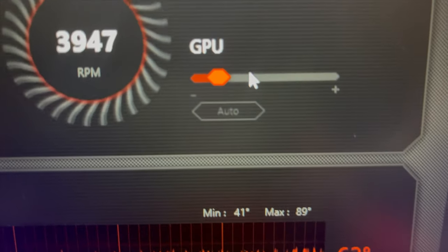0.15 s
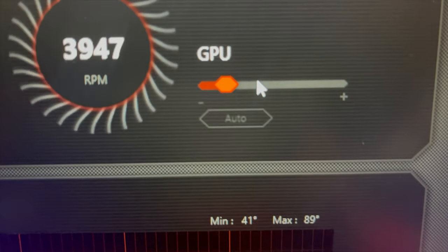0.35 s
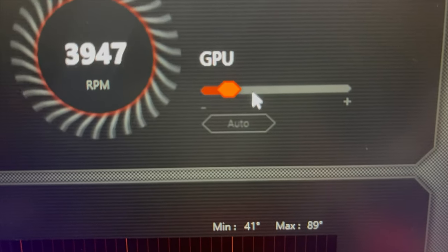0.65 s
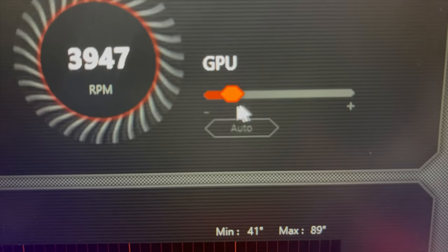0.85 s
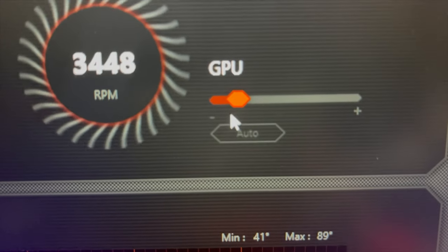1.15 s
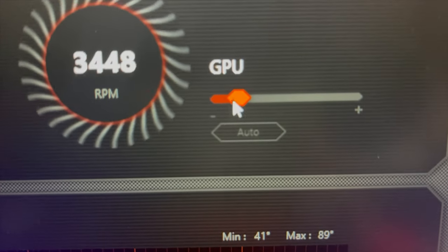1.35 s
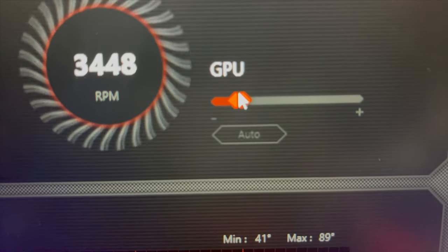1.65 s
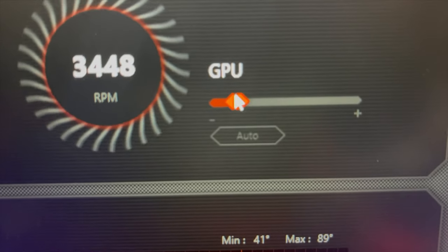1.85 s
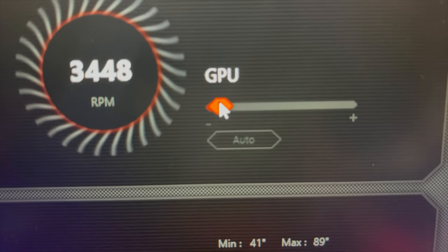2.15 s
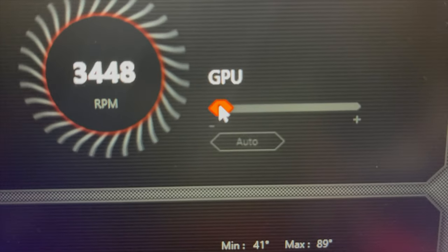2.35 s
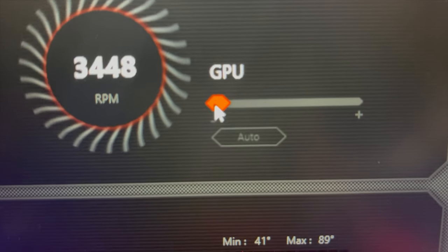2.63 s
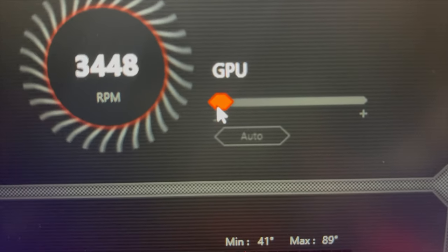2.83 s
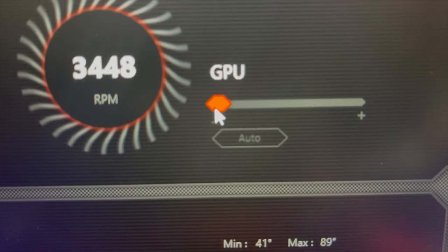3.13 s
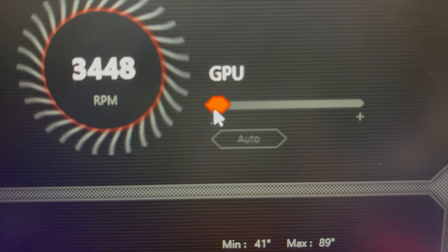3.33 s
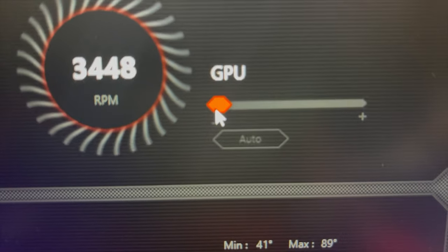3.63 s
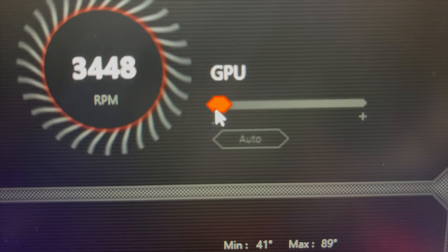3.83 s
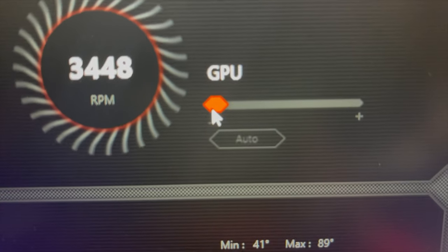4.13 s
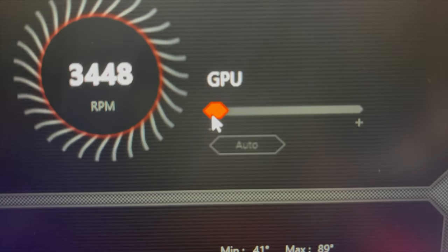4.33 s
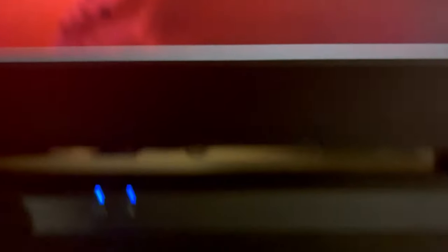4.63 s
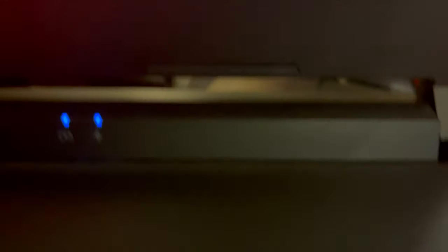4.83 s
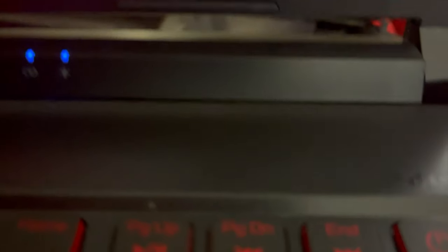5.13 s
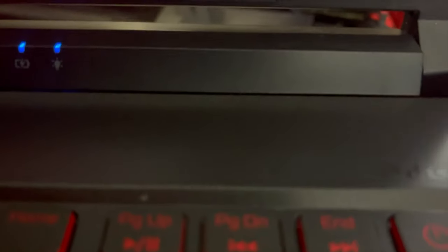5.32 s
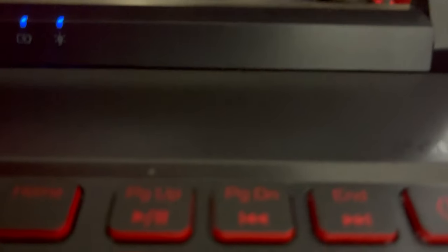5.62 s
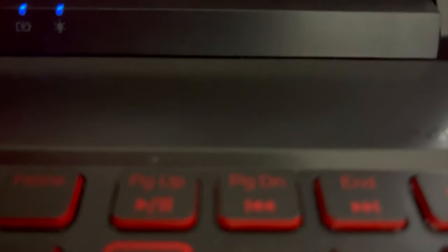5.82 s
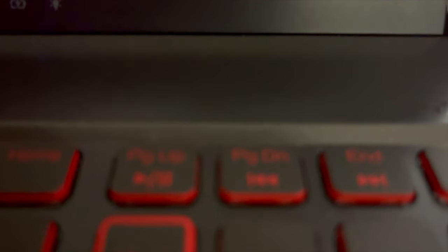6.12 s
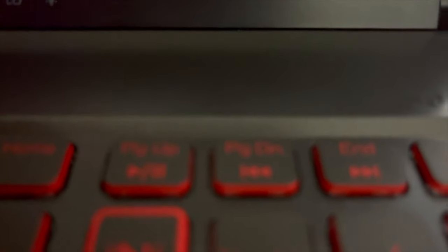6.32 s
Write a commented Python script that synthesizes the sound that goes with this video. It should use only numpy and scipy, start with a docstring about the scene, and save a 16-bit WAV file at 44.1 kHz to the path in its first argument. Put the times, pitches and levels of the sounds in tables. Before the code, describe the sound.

Low laptop fan hum with a quickening flutter and small button clicks, cutting abruptly to a nearer, throbbing, whining, hissing growl.

```python
"""At a laptop's screen, and from 4.4 s right at its vent: a worn fan flutters ever faster against a second fan
as a controller parts their speeds in short glides. Shaft harmonics with beat sidebands make its tones, and
filtered noise chopped by the rotor makes its air. The second fan whistles and whines. The touchpad button clicks
(decaying noise and modes). A softly thudding motor drone and mains hum are sines; at the vent the worn rotor's
unbalance beats against the drone, about eight throbs a second."""
import sys
import numpy as np
from scipy.fft import rfft, irfft, next_fast_len
from scipy.io import wavfile
from scipy.ndimage import map_coordinates

SR = 44100
rng = np.random.default_rng(int(sys.argv[2]) if len(sys.argv) > 2 else 0)


def transcribe(u):
    """Save the signal u as a 16-bit wav file named by the first command-line argument.

    u: samples, shape (n,) or (channels, n), limited to [-1, 1]; the rate is SR.
    q: integer samples, one column per channel.
    """
    v = np.clip(np.atleast_2d(u).T, -1, 1)
    q = np.round(v * 32767).astype(np.int16)
    wavfile.write(sys.argv[1], SR, q)


N = 285327
T = np.arange(N) / SR

# worn fan's tones at the screen, before waver and tilt: turn_multiple, then peak level of five lines:
# two_beats_below_db, one_below_db, centre_db, one_above_db, two_above_db
TONES_FAR = [(5, -75, -67, -59, -67, -67), (6, -64, -57, -45.5, -57, -60), (7, -62, -47, -54, -58, -62),
             (8, -70, -66, -60, -65, -68), (10, -70, -59, -60, -63, -62), (11, -68, -52, -54, -54, -56),
             (12, -57, -50.5, -50, -57, -64), (13, -65, -49.5, -51, -51.5, -63),
             (14, -61, -61, -65, -64, -70)]
# the same at the vent, before growl and throbs: turn_multiple, two_beats_below_db, one_below_db, centre_db,
# one_above_db, two_above_db
TONES_NEAR = [(2, -70, -58, -54, -45, -62), (3, -48, -42.5, -53, -60, -70), (4, -58, -54, -57, -58, -62),
              (5, -45.5, -54, -49, -56, -58), (6, -56, -46, -39.5, -58, -58), (7, -66, -49, -52, -53, -63),
              (8, -60, -66, -52, -59, -62), (9, -66, -68, -49.5, -60, -62), (10, -70, -45.5, -51, -60, -60),
              (11, -62, -46, -46, -46, -55), (12, -56, -40, -49, -54, -54), (13, -58, -39, -49, -58, -66),
              (14, -62, -55, -70, -69, -68), (15, -70, -56, -68, -70, -70)]
# vent tones that throb, as three turns of the second fan almost match two of the worn one:
# turn_multiple, depth_0_to_1, swell_s
THROBS = [(3, .35, 5.5), (6, .38, 5.39), (7, .5, 5.34)]
# steady lines of the room's hum, at the screen: pitch_hz, peak_db
HUM_LINES = [(71.85, -51), (83.6, -51), (119.83, -45), (155.5, -50), (179.75, -56.5), (239.66, -41.5),
             (299.6, -54), (419.4, -52.5)]
# low air noise at the screen: freq_hz, density_db_per_hz
RUSH_FAR = [(20, -85), (34, -67), (50, -63.5), (85, -62), (140, -59.5), (200, -68), (310, -71),
            (420, -69.5), (520, -72.5), (780, -71), (870, -68), (980, -82.5), (1400, -110), (6000, -150)]
# low air noise at the vent: freq_hz, density_db_per_hz
RUSH_NEAR = [(20, -87), (34, -80), (50, -50.5), (90, -58.5), (150, -59.5), (210, -64), (310, -67.5),
             (400, -66), (520, -72), (780, -65), (870, -68), (980, -71.5), (1400, -110), (6000, -150)]
# high air noise at the screen: freq_hz, density_db_per_hz
HISS_FAR = [(600, -100), (1000, -73), (1450, -80.5), (1650, -80.5), (2200, -83), (2500, -77.5), (3000, -80),
            (4200, -92.5), (6600, -92.5), (7600, -100), (8600, -96.5), (9550, -89), (10300, -97),
            (11800, -101), (13200, -135)]
# high air noise at the vent: freq_hz, density_db_per_hz
HISS_NEAR = [(600, -100), (1000, -77.5), (1600, -79.5), (2100, -75.5), (2550, -73), (3100, -81),
             (3900, -88), (5300, -84.5), (6500, -87.5), (7400, -99), (8700, -96), (10300, -91),
             (11800, -100), (13200, -135)]
# narrow resonances between screen and keyboard: centre_hz, width_hz, level_db
HINGE = [(1092, 73, 4.5), (1310, 71, 0.5), (1450, 87, 9), (2002, 50, 9), (2418, 103, 7.5), (3130, 155, -12),
         (3290, 200, 6.5), (3440, 78, -3.5), (4670, 150, 2), (4850, 170, -7), (5020, 46, 6.5),
         (5350, 150, 5.5), (5900, 80, 6.5), (6180, 160, -1.5), (6180, 55, 12.5), (6540, 49, 8),
         (6720, 50, 8), (6800, 46, 4), (7170, 64, -1.5)]
# resonances of the screen's panel, lifting lines that glide onto them: centre_hz, width_hz, level_db
PANEL = [(831, 8, 5), (700, 8, 3)]
# resonances and hollows of the vent's duct: centre_hz, width_hz, level_db
DUCT = [(1780, 53, -3), (2560, 73, 4), (3000, 100, 3.5), (3250, 110, 4.5), (3420, 110, -2.5),
        (4570, 120, 4), (5270, 200, 3), (6110, 110, -3), (6500, 80, 6), (6770, 120, 5.5)]
# likeness of the two microphone ports: freq_hz, likeness_0_to_1
ALIKE = [(60, 1), (130, 0.83), (380, 0.55), (640, 0.73), (880, 0.75), (1100, 0.31), (1600, 0.36),
         (2400, 0.6), (4400, 0.62), (6500, 0.56), (7500, 0.3), (8500, 0.51), (9200, 0.59), (10300, 1)]
# level between the ports: freq_hz, left_minus_right_db
BALANCE = [(60, -0.5), (130, -2), (400, -0.5), (800, 1), (1500, -1.5), (2500, -3.5), (5000, -1), (7000, 0)]
# phase between the ports: freq_hz, right_lead_rad
LEAD = [(60, 0), (400, .15), (600, .35), (700, .75), (780, 1.1), (850, 1.8), (950, 2.1), (1300, 3.2),
        (1700, 3.8), (2000, 5.7), (2500, 6.6), (3300, 6.5), (4200, 7.1), (6200, 6.7), (7500, 8.2),
        (8400, 6.3), (8900, 6.3), (10300, 3.2), (10900, 2.8), (11500, .2)]
# controller's retunings: start_s, worn_fan_change_hz, second_fan_change_hz
SPEED_STEPS = [(0.41, 0.59, 0.13), (2.18, 1.2, -1.7), (3.29, 0.49, -1.82), (4.63, 0.33, -1.78),
               (5.79, 0.34, -1.76)]
# second fan's motor whine: turn_multiple, screen_peak_db, vent_peak_db
WHINE = [(8, -63, -45), (12, -51, -52), (18, -65, -41.5)]
# whooshing slots of the vent's grille, before scraping: from_s, to_s, centre_hz, width_hz, rms_db
SLOTS = [(4.38, 4.864, 1960, 130, -50.5), (4.876, 6.02, 2490, 517, -50)]
# brief rubs of the loose rotor: centre_s, level_db
RUBS = [(4.557, -35.5), (5.037, -37), (5.276, -37), (5.542, -34), (5.679, -39), (5.825, -34.5),
        (5.963, -37.5)]
# touchpad dome snaps down, bottoms out and later springs up: start_s, level_db, ping_hz
SNAPS = [(1.685, -26, 5400), (1.6875, -28, 5400), (2.5393, -19, 7050)]
# freed pad rattles back: start_s, level_db
KNOCKS = [(2.603, -26), (2.6115, -30), (2.618, -27.5)]
# crack of the dome: freq_hz, relative_db
DOME_CRACK = [(1500, -26), (4200, -19), (5400, -7), (6200, -21), (7100, -8), (8000, 0), (9500, -7),
              (10300, 8), (11300, 3), (12000, -15), (14000, -34), (15300, -27), (17000, -45)]
# crack of the pad: freq_hz, relative_db
PAD_CRACK = [(600, -5), (1050, 2), (1500, -7), (2300, 3), (3100, -10), (4000, -20), (5200, -9), (6800, -8),
             (8900, 9), (10000, -6), (11500, -11), (13000, -53)]
# ringing of the dome: pitch_hz, relative_db, t60_s
DOME_MODES = [(6650, -10, 0.025), (7380, -6, 0.021), (8200, -7.5, 0.028), (9200, -8, .03),
              (9800, -15, 0.12), (10660, -13, .03), (11200, -4.5, .03), (12600, -14.5, .02),
              (15200, -18, .012)]
# ringing of the pad: pitch_hz, relative_db, t60_s
PAD_MODES = [(1010, -9, .1), (1830, -8, .03), (2331, -3.5, .045), (3050, -12, .03), (5006, -15, .035),
             (5437, -16, .03), (8533, -7, .03), (9050, -4, .03), (11400, -12, .03)]
# room's answer to a click: freq_hz, relative_db
ECHO = [(1000, -7), (5000, -4), (9700, 1.5), (11500, -2), (13000, -50)]

TOP_HZ = 17000
AT_VENT_S = 4.4  # the microphone is at the vent from here on

# rotors; pairs are worn fan, second fan
START_HZ = (62.61, 55.25)
VENT_JUMP_HZ = (1.83, -4.08)  # added at the vent
GLIDE_S = .59  # time to reach a new speed
IN_STEP_S = 5.014  # unbalance and drone swell together
FANS_MEET_S = (3.3197, 5.2626)  # the rotors push the chassis together: at the screen, at the vent
STRAIN_FROM_S, STRAIN_RISE_S = 2, 2  # strain between the rotors builds as their speeds part
PIVOT_ORDER, TILT_DB_PER_ORDER = 9, .8  # full strain tilts the screen tones upward about this multiple
WAKE_FROM_S, WAKE_DB = 0.4, 2.5  # upper tones and second fan grow by this much

# worn fan's air
FLAP_FROM_HZ, FLAP_DB = 660, 2.5  # at full strain the rush above this swings by +-FLAP_DB with each beat
STRAINED_FLOW_CUT_DB = 5  # and is softer by this much
GRIP_GROWTH = .5  # share by which the scraping deepens
GROWL_START_DB, GROWL_DB_PER_S = -1.5, 1.13
HISS_TOP_HZ, HISS_SWELL_S, HISS_SWELL_DB = 3600, .4, 5  # top grows as the microphone settles at the vent
SLOT_FADE_S = 0.24
RUB_HZ, RUB_WIDTH_HZ, RUB_HALF_S = 2500, 800, .004

# second fan; whistle levels before the jet
WHISTLE_FAR_DB, WHISTLE_NEAR_DB = -58, -54
JET_AT_S, JET_HALF_S, JET_DB = 5.12, .39, 8.5  # the microphone drifts through the fan's jet

# room; drone and under levels before their swell
DRONE_HZ, DRONE_DB, DRONE_WAVER_DB, DRONE_LEFT_DB = 59.09, -27.4, .2, 0.12
UNDER_HZ, UNDER_DB = 47.33, -46.5  # a deeper hum
SWELL_AT_S, DRONE_SWELL_DB, UNDER_SWELL_DB = 1.53, 2, 6.5  # both grow once and stay up
THUD_AT_S, THUDS_PER_S = .055, 11.975
THUD_HZ, THUD_HALF_S, THUD_SLIP_RAD, THUD_DB = 129, .0095, .18, -31.5
HUM_VENT_DB = 2  # hum's gain at the vent

PING_DB, PING_WIDTH_HZ, PING_T60_S = -4, 400, 0.024

PORT_HALVES = np.array([[.5], [-.5]])  # left, right


def amp(db):
    """Decibels to gain."""
    return 10 ** (np.asarray(db) / 20)


def unit(x):
    """Scale to rms 1."""
    return x / np.sqrt(np.mean(x ** 2) + 1e-20)


def along(points, hz):
    """(Hz, value) points read on a log axis."""
    f, v = np.transpose(points)
    return np.interp(np.log(hz + 1), np.log(f + 1), v)


def ramp(start_s, length_s):
    """A smooth rise from 0 to 1."""
    u = np.clip((T - start_s) / length_s, 0, 1)
    return u * u * (3 - 2 * u)


def wobble(knots_per_s):
    """A smooth random curve through normal knots."""
    coarse = T[::100]
    knots = rng.standard_normal(int(T[-1] * knots_per_s) + 4)
    return np.interp(T, coarse, map_coordinates(knots, [coarse * knots_per_s]))


def filtered(x, response):
    """x times a response of frequency."""
    m = next_fast_len(N + 8192)
    return irfft(rfft(x, m) * response(np.fft.rfftfreq(m, 1 / SR)), m)[..., :N]


def angle(hz, in_step_s, other_hz=DRONE_HZ):
    """Angle gained on another rotation; the two line up at in_step_s."""
    turns = np.cumsum(hz - other_hz) / SR
    return 2 * np.pi * (turns - np.interp(in_step_s, T, turns))


def bumps_db(bumps, hz):
    """Level change from narrow resonances."""
    return sum(db / (1 + (2 * (hz - f) / width) ** 2) for f, width, db in bumps)


def ports(pair, gain):
    """Two unrelated signals become coloured left and right, partly alike, with level and phase offsets."""
    def mix(hz):
        turn = np.arccos(np.clip(along(ALIKE, hz), -1, 1)) / 2
        return gain(hz) * np.array([np.cos(turn), np.sin(turn)])

    def offset(hz):
        return amp(PORT_HALVES * along(BALANCE, hz)) * np.exp(-1j * PORT_HALVES * along(LEAD, hz))

    mid, side = filtered(pair, mix)
    return filtered(np.array([mid + side, mid - side]), offset)


def tone(phase, hz):
    """A sine as the two ports hear it."""
    return amp(PORT_HALVES * along(BALANCE, hz)) * np.sin(phase - PORT_HALVES * along(LEAD, hz))


def air(spectrum, bumps=()):
    """Stereo turbulence noise with narrow resonances on its spectrum."""
    white = rng.standard_normal((2, N)) * np.sqrt(SR / 2)
    return ports(white, lambda hz: amp(along(spectrum, hz) + bumps_db(bumps, hz)))


def whoosh(centre_hz, width_hz):
    """Stereo noise of rms 1 in one resonance."""
    white = rng.standard_normal((2, N))
    return unit(ports(white, lambda hz: 1 / (1 + ((hz - centre_hz) / width_hz * 2) ** 4)))


def fading(hits, t60_s):
    """Envelope of blows that rise very fast and die away; overlaps add in power."""
    power, age = np.zeros(N), np.arange(SR // 2) / SR
    for s, db in hits:
        blow = (1 - np.exp(-age / 0.00033)) * amp(db - 60 * age / t60_s)
        power[round(s * SR):][:len(age)] += blow ** 2
    return np.sqrt(power)


def ringing(hits, modes, scatter_db=2.0):
    """Each blow rings decaying modes anew, with random level and phase."""
    out, age = np.zeros((2, N)), np.arange(SR // 4) / SR
    attack = 1 - np.exp(-age / 0.00026)
    for s, db in hits:
        for hz, mode_db, t60_s in modes:
            peak_db = db + mode_db + scatter_db * rng.standard_normal()
            fade = amp(peak_db - 60 * age / t60_s) * attack
            ring = np.sin(2 * np.pi * (hz * age + rng.random((2, 1))))
            out[:, round(s * SR):][:, :len(age)] += fade * ring
    return out


def speeds():
    """Turns per second of the worn and the second fan: each controller step is a short glide."""
    hz = np.array(START_HZ)[:, None] + np.outer(VENT_JUMP_HZ, T > AT_VENT_S)
    return hz + sum(np.outer([worn, second], ramp(s, GLIDE_S)) for s, worn, second in SPEED_STEPS)


def rattle():
    """Gain of upper bearing tones and second fan, which wake with the first change of speed."""
    return amp(WAKE_DB * (ramp(WAKE_FROM_S, GLIDE_S) - 0.5))


def room_hum(drone_angle):
    """A motor drones just under mains speed and thuds softly, with a deeper wavering hum and mains hum."""
    swell = ramp(SWELL_AT_S, GLIDE_S)
    drone_db = DRONE_DB + DRONE_SWELL_DB * swell + DRONE_WAVER_DB * wobble(2.76)
    drone = amp(drone_db) * tone(drone_angle, DRONE_HZ)
    drone = amp([[DRONE_LEFT_DB], [-DRONE_LEFT_DB]]) * drone

    under_angle = drone_angle + angle(np.full(N, UNDER_HZ), in_step_s=3.053)
    under_db = UNDER_DB + UNDER_SWELL_DB * swell + 0.65 * wobble(3.6)
    under = amp(under_db) * tone(under_angle, DRONE_HZ)

    age = (((T - THUD_AT_S) * THUDS_PER_S + .5) % 1 - .5) / THUDS_PER_S  # s from the nearest thud
    thud_level = amp(THUD_DB + wobble(12)) * np.exp(-(age / THUD_HALF_S) ** 2)
    thuds = thud_level * tone(2 * np.pi * THUD_HZ * age + THUD_SLIP_RAD * wobble(10), THUD_HZ)

    hum = sum(amp(db + 0.62 * wobble(1.98)) * tone(2 * np.pi * (hz * T + rng.random()), hz)
              for hz, db in HUM_LINES)
    return drone + under + thuds + amp(HUM_VENT_DB * ramp(AT_VENT_S, GLIDE_S)) * hum


def touchpad(snap_t60_s=0.015, knock_t60_s=0.022, room_t60_s=0.17, room_db=-15):
    """The button's metal dome snaps and pings, and the plastic pad rattles back; the room answers faintly."""
    def noise(spectrum):
        return unit(ports(rng.standard_normal((2, N)), lambda hz: amp(along(spectrum, hz))))

    snaps = [(s, db) for s, db, hz in SNAPS]
    ping = sum(fading([(s, db)], PING_T60_S) * whoosh(hz, PING_WIDTH_HZ) for s, db, hz in SNAPS)
    dome = amp(PING_DB) * ping + ringing(snaps, DOME_MODES) + fading(snaps, snap_t60_s) * noise(DOME_CRACK)
    pad = ringing(KNOCKS, PAD_MODES) + fading(KNOCKS, knock_t60_s) * noise(PAD_CRACK)
    echo = amp(room_db) * fading(snaps + list(KNOCKS), room_t60_s) * noise(ECHO)
    return dome + pad + echo


def second_fan(rotor, near):
    """A healthy fan: its 47 blades whistle at blade-pass rate and its motor whines at turn multiples."""
    def heard(far_db, near_db):
        return amp(far_db * (1 - near) + near_db * near)

    jet = amp(JET_DB * np.exp(-((T - JET_AT_S) / JET_HALF_S) ** 2))
    blades = amp(wobble(15)) * tone(47 * rotor + wobble(30) / 3, 2200)
    whistle = jet * heard(WHISTLE_FAR_DB, WHISTLE_NEAR_DB) * blades
    motor = sum(heard(far_db, near_db) * tone(round(k) * rotor, k * START_HZ[1])
                for k, far_db, near_db in WHINE)
    return rattle() * (whistle + motor)


def bearing(rotor, beat, tones, slip_rad, waver_db, strain=0, panel=(), throbs={}):
    """Shaft harmonics; the other fan shakes the loose rotor, so each flutters with two sidebands per side."""
    def slow(x):
        return np.broadcast_to(x, N)[::60]

    side = np.arange(-2, 3)[:, None]
    sign = np.array([[-1], [1], [1], [1], [-1]])  # broad tops, narrow dips
    turn_hz, beat_hz = [np.gradient(slow(a), slow(T)) / (2 * np.pi) for a in (rotor, beat)]
    shake = sign * np.exp(1j * side * slow(beat))
    woken = slow(rattle())
    out = np.zeros((2, N))
    for multiple, *lines_db in tones:
        k = round(multiple)
        db = np.array(lines_db)[:, None] + bumps_db(panel, k * turn_hz + side * beat_hz)
        db = db + waver_db * slow(wobble(2.66))
        db = db + TILT_DB_PER_ORDER * slow(strain) * (k - PIVOT_ORDER)
        lines = (amp(db) * shake).sum(0)
        if k > PIVOT_ORDER:
            lines = lines * woken
        shaken = np.interp(T, slow(T), lines) * throbs.get(k, 1)
        phase = k * rotor + slip_rad * wobble(3.57) + rng.uniform(0, 2 * np.pi)
        out += abs(shaken) * tone(phase + np.angle(shaken), k * turn_hz.mean())
    return out


def scrape(rotor, cage, once, twice):
    """The loose rotor chops its noise once and twice a turn, the ball cage every third turn."""
    return unit(np.exp(cage * np.cos(rotor / 3) + once * np.cos(rotor) + twice * np.cos(2 * rotor)))


def grille():
    """Air whooshes in the slots as the microphone passes them, and the rotor rubs now and then."""
    def passing(start_s, end_s):
        fade_in = ramp(start_s - SLOT_FADE_S / 2, SLOT_FADE_S)
        return fade_in - ramp(end_s - SLOT_FADE_S / 2, SLOT_FADE_S)

    slots = sum(amp(db) * passing(start, end) * whoosh(hz, width) for start, end, hz, width, db in SLOTS)
    rubs = sum(amp(db) * np.exp(-((T - s) / RUB_HALF_S) ** 2) for s, db in RUBS)
    return slots + rubs * whoosh(RUB_HZ, RUB_WIDTH_HZ)


def worn_fan_far(rotor, beat):
    """At the screen: bearing tones, loose at first, in a rush of air whose upper part flaps with the beat."""
    strain = ramp(STRAIN_FROM_S, STRAIN_RISE_S)
    tones = bearing(rotor, beat, TONES_FAR, slip_rad=.22 - .14 * strain, waver_db=1,
                    strain=strain, panel=PANEL)
    grip = 1 + GRIP_GROWTH * ramp(STRAIN_FROM_S, GLIDE_S)
    hiss = air(HISS_FAR, HINGE) * scrape(rotor, cage=0.07 * grip, once=0.11 * grip, twice=0.09)
    rush = air(RUSH_FAR) * scrape(rotor, cage=0.035, once=0.032, twice=0.11)
    upper_rush = filtered(rush, lambda hz: hz > FLAP_FROM_HZ)
    flap_gain = amp(strain * (FLAP_DB * np.cos(beat) - STRAINED_FLOW_CUT_DB))
    airflow = amp(0.35 - 1.0 * strain)  # the air noise eases as the second fan slows
    return tones + airflow * (rush + upper_rush * (flap_gain - 1) + hiss)


def worn_fan_near(rotor, beat, throb_hz, left_db=3.0, rush_db=-1.0):
    """At the vent: unbalance hums a little to the left, the bearing growls and throbs, the hiss rasps."""
    unbalance = amp(-27.5 + 0.18 * wobble(8.8)) * amp([[left_db], [-left_db]]) * tone(rotor, DRONE_HZ)
    throbs = {k: 1 + depth * np.exp(1j * angle(throb_hz, s, 0)) for k, depth, s in THROBS}
    growl = amp(GROWL_START_DB + GROWL_DB_PER_S * np.maximum(T - AT_VENT_S, 0))
    tones = growl * bearing(rotor, beat, TONES_NEAR, slip_rad=.06, waver_db=.6, throbs=throbs)
    hiss = (air(HISS_NEAR, DUCT) + grille()) * scrape(rotor, cage=0.05, once=0.2, twice=0.15)
    rush = air(RUSH_NEAR) * scrape(rotor, cage=0.026, once=0.065, twice=0.071)
    rush = rush * amp(0.11 * np.cos(beat))
    top_gain = amp(HISS_SWELL_DB * (ramp(AT_VENT_S, HISS_SWELL_S) - 1))
    shaded = filtered(hiss, lambda hz: hz > HISS_TOP_HZ) * (1 - top_gain)
    return unbalance + tones + amp(rush_db) * rush + amp(-0.04 + 0.56 * wobble(9)) * (hiss - shaded)


def scene():
    """The worn fan from two places, with the second fan, the room and the button."""
    drone_angle = 2 * np.pi * DRONE_HZ * T
    worn_hz, second_hz = speeds()
    rotor = drone_angle + angle(worn_hz, IN_STEP_S)
    far_beat, near_beat = [angle(worn_hz, s, second_hz) for s in FANS_MEET_S]  # quickens as speeds part
    throb_hz = 3 * second_hz - 2 * worn_hz
    near = np.clip((T - AT_VENT_S) / .02 + .5, 0, 1)  # 20 ms crossfade
    worn_far = np.sqrt(1 - near) * worn_fan_far(rotor, far_beat)
    worn_near = np.sqrt(near) * worn_fan_near(rotor, near_beat, throb_hz)
    return worn_far + worn_near + second_fan(rotor - far_beat, near) + room_hum(drone_angle) + touchpad()


def record(dry):
    """The microphone's band limit: nothing passes above TOP_HZ."""
    return filtered(dry, lambda hz: hz < TOP_HZ)


dry = scene()
out = record(dry)
transcribe(out)
```